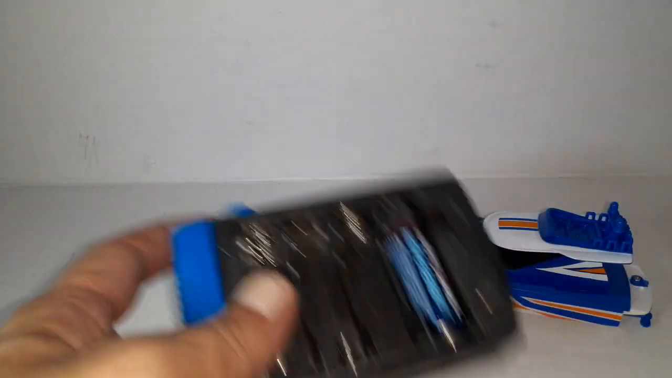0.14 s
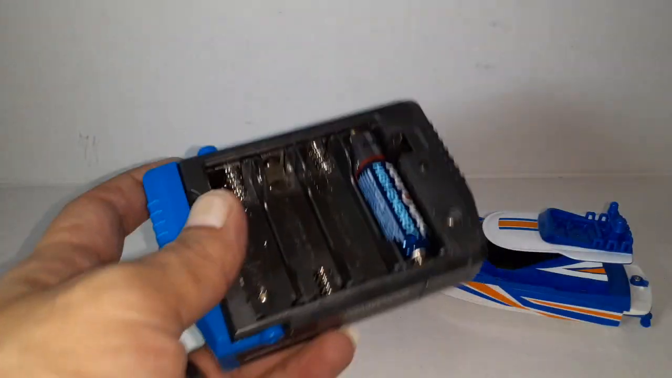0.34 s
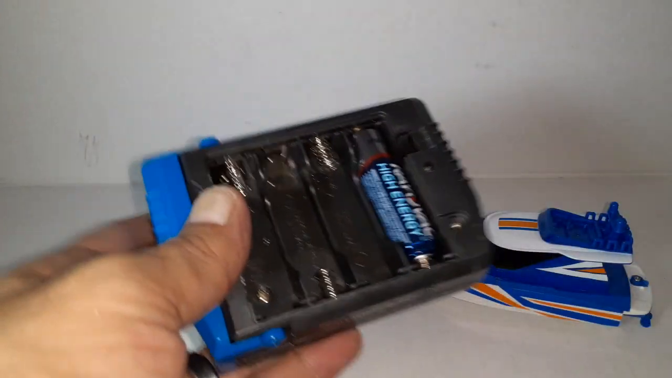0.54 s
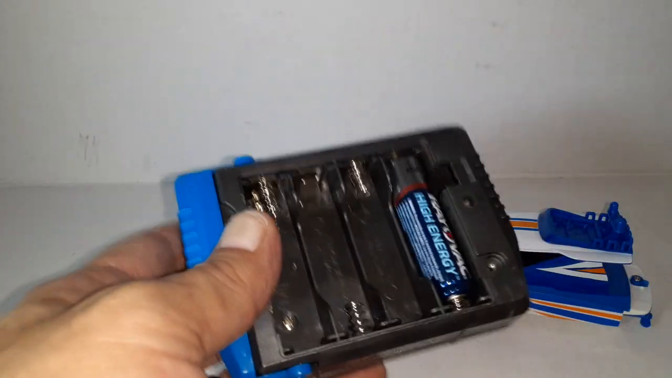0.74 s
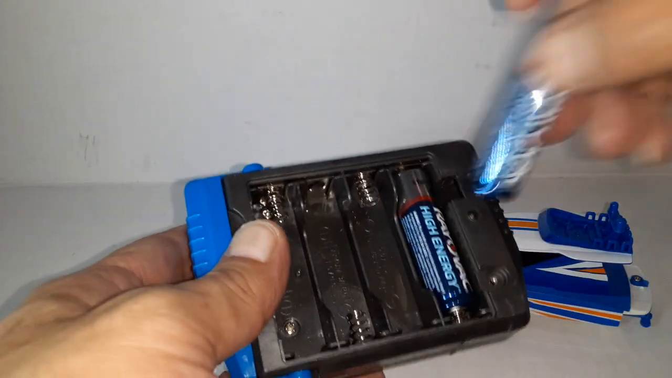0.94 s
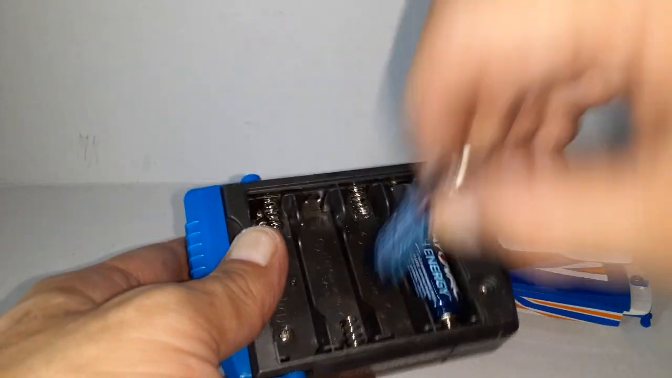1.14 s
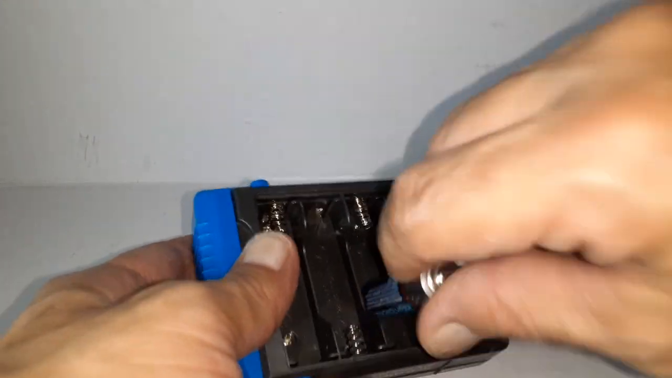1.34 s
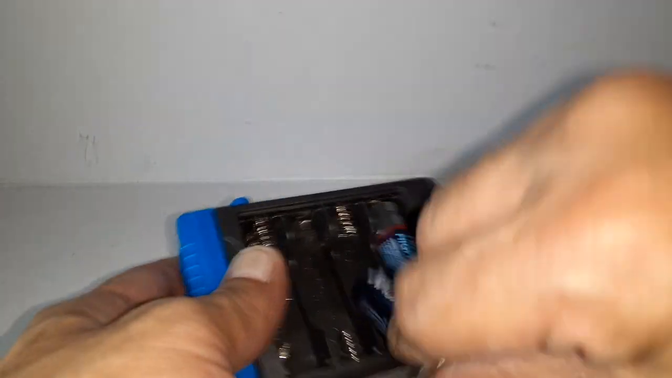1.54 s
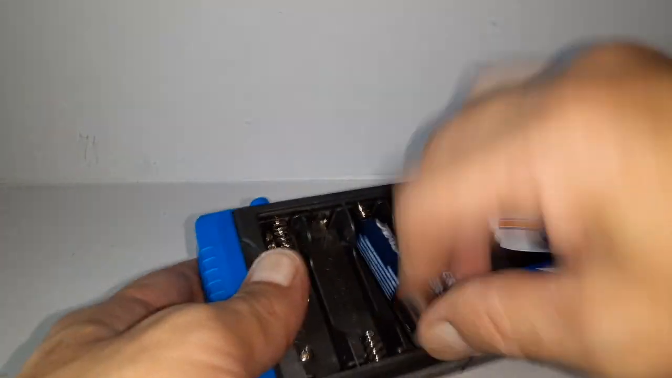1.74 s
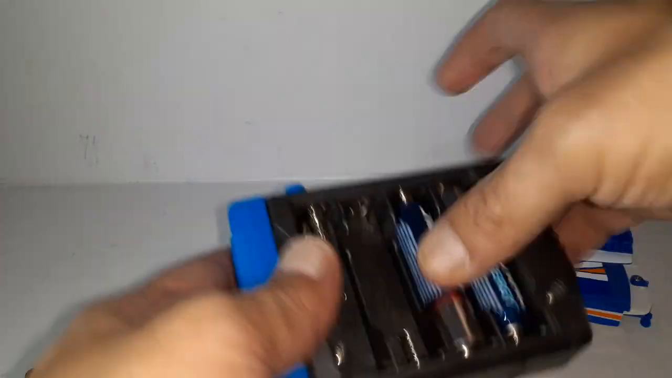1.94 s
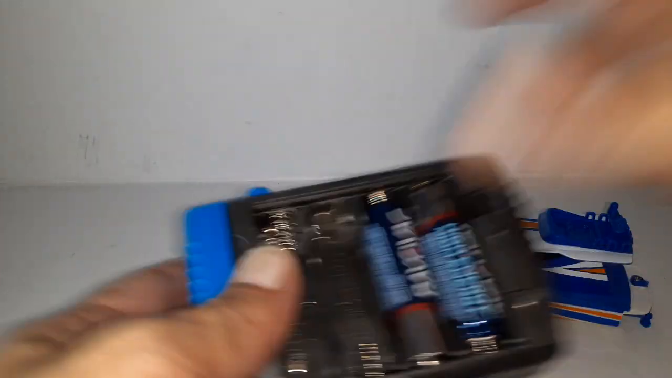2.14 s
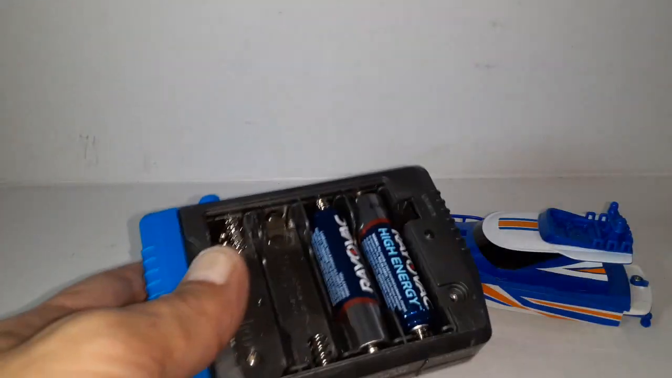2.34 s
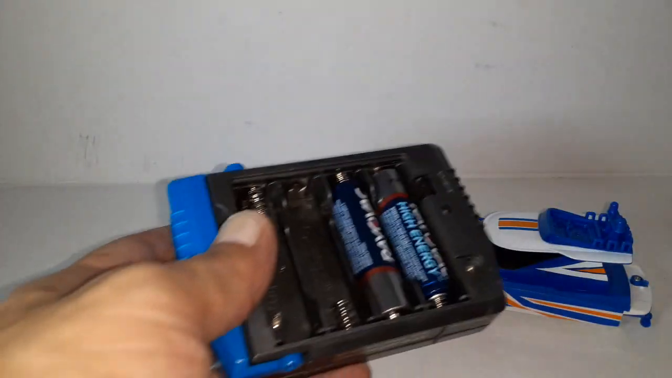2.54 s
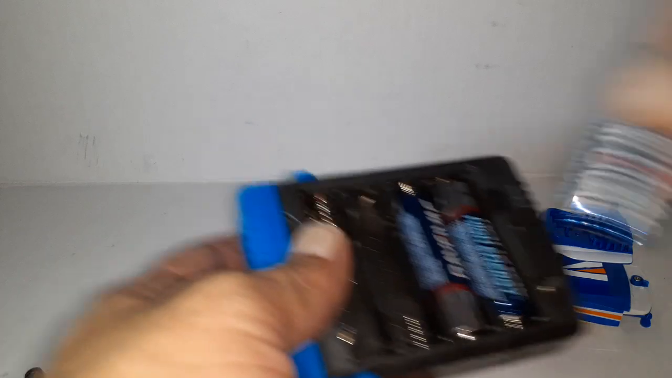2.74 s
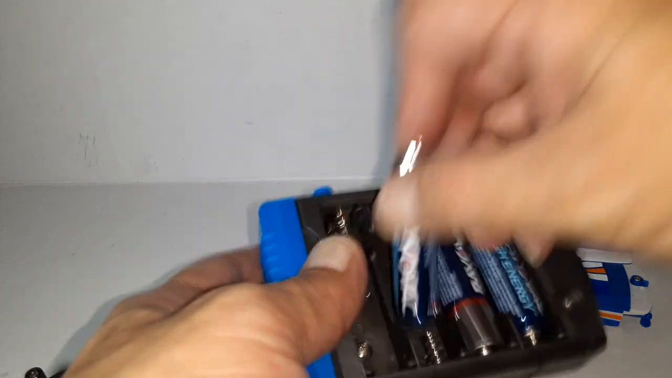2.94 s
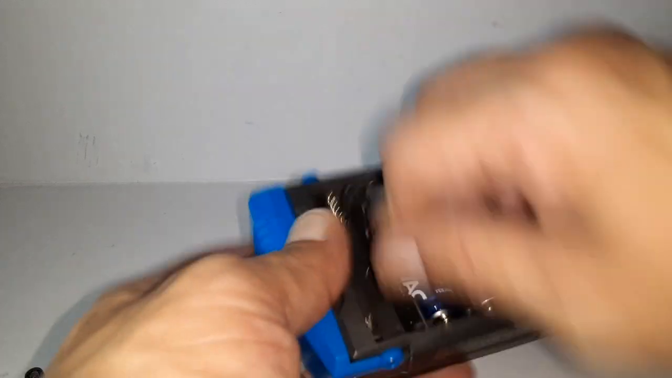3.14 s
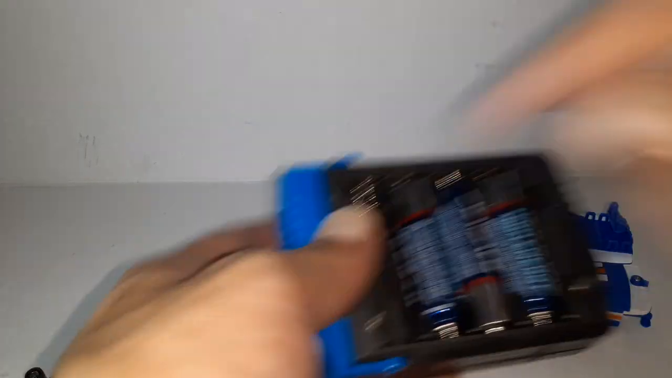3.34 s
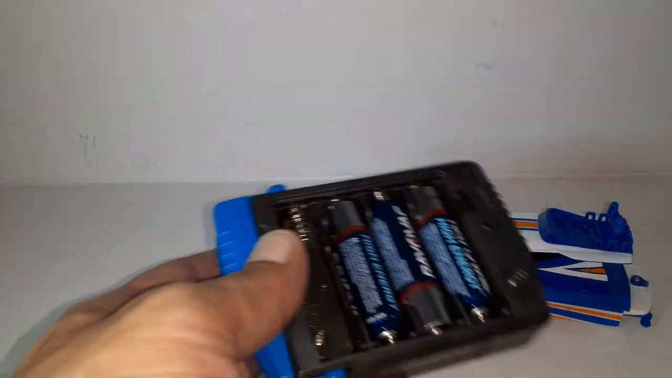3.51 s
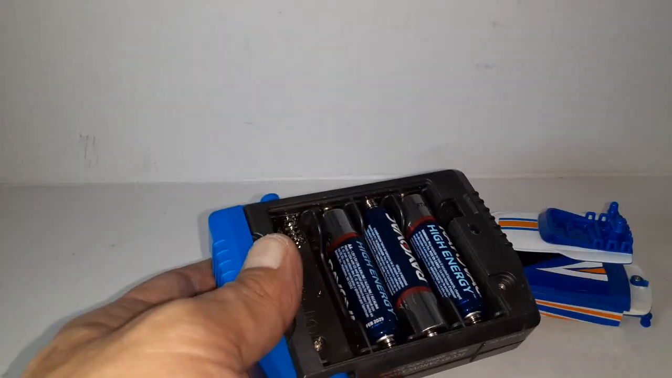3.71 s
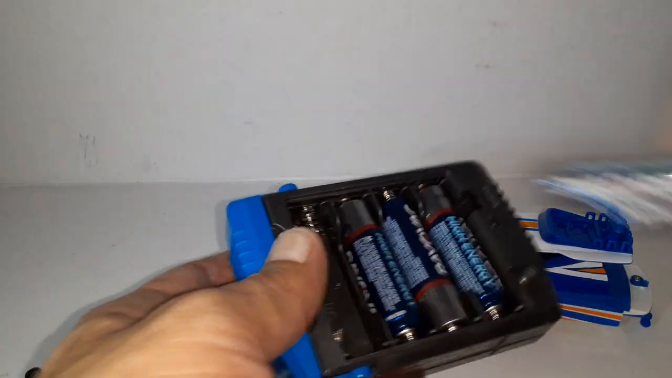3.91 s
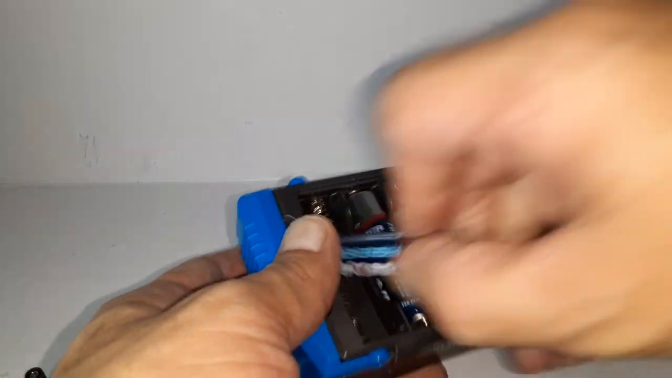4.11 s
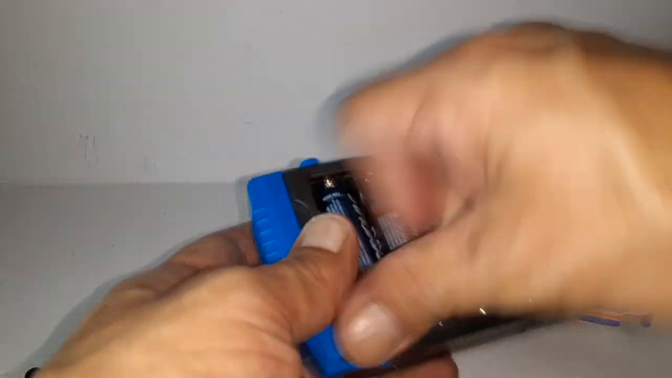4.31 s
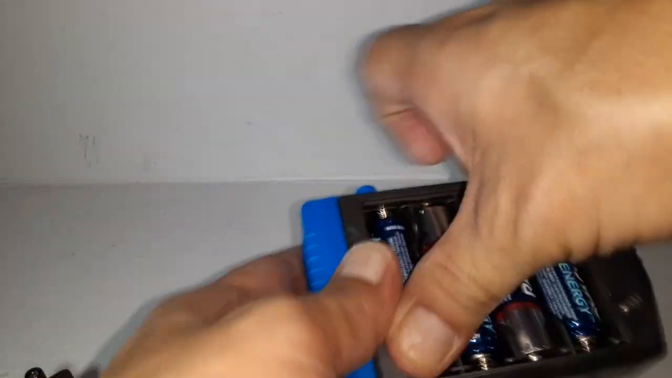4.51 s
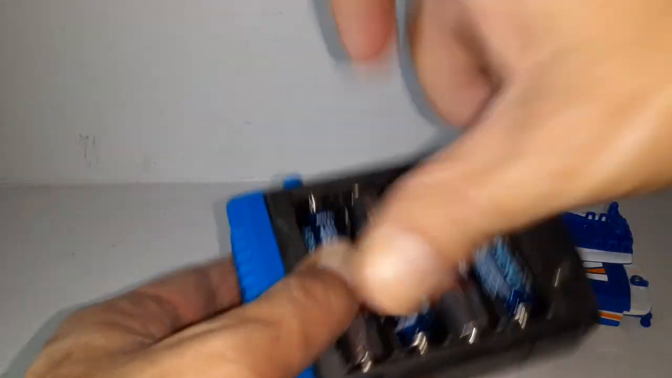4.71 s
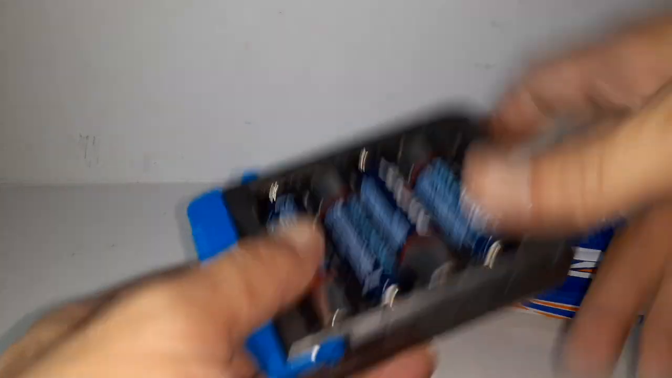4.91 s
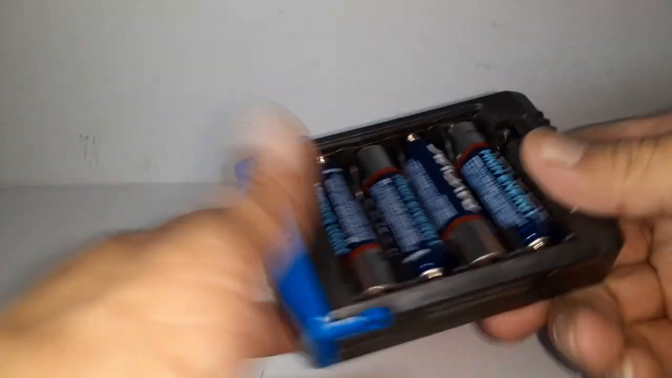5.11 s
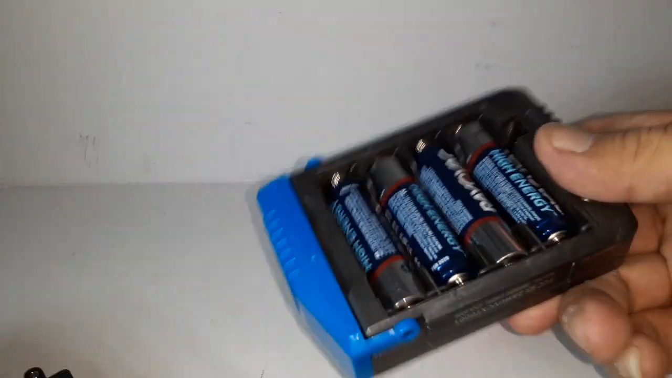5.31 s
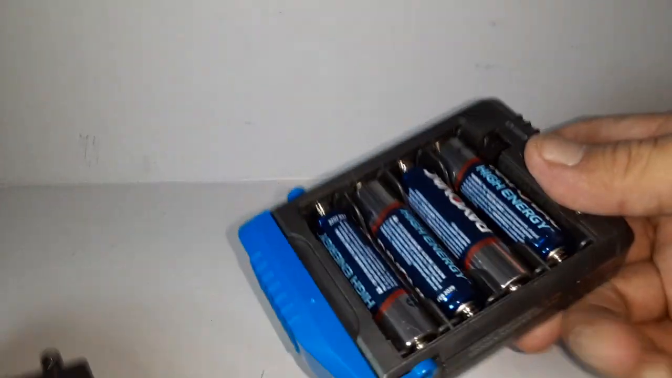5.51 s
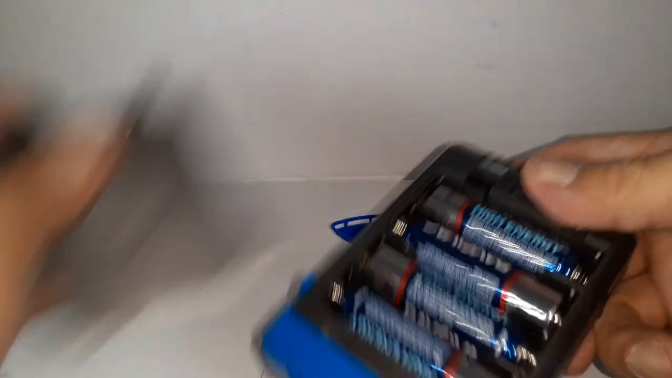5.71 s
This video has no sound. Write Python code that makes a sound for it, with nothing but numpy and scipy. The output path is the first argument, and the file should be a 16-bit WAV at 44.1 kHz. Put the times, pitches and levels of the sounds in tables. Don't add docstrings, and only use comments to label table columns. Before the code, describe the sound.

Close stereo phone pickup in a small quiet room. Faint plastic ticks as a battery case turns in a hand, then a cell is fumbled in with scraping and a dense run of hard clacks. Two more cells follow in separate bursts with metal chatter and small spring twangs, then the lid gives a hollow knock. Low hum and soft hiss lie underneath.

```python
import sys
import numpy as np
from scipy import signal
from scipy.fft import rfft, irfft
from scipy.io import wavfile
from scipy.ndimage import uniform_filter1d

SR = 44100
rng = np.random.default_rng(int(sys.argv[2]) if len(sys.argv) > 2 else 0)


def boost_factor(decibels):
    exponent = np.asarray(decibels, float) / 20
    return 10 ** exponent


def wrap_up_sound(samples):
    columns = np.atleast_2d(samples).T
    tamed = np.clip(columns, -1, 1)
    steps = np.round(tamed * 32767).astype(np.int16)
    wavfile.write(sys.argv[1], SR, steps)


N = 254016

# (frequency [Hz], density [dB per Hz])
METAL = [(2060, -33), (3500, -1.5), (4730, -1.5), (7050, -5.5), (7990, -9.5), (8830, -5), (10900, -5.5),
         (15600, -9)]
LID_FROM_S = 5.33
# (lag of right port [ms], left minus right [dB], phase scatter [rad])
WALL_PORTS, HOLLOW_PORTS = (.12, 8.5, .45), (.08, 6, .35)


def knocks():
    out = np.zeros((2, N + SR))
    size = 2048
    lead = size // 8
    t = np.arange(size) / SR
    first = int(.0045 * SR)
    closing_s, rebound_db = .0005, 4.2
    snap = 4.7
    port_db = np.array([[.7], [-.7]])
    for s, wall_db, hollow_db, metal_db, bright_db, chatter_ms in blows():
        wall_modes, bay_modes, bright_db = place(s, bright_db)
        decay = np.exp(-t * 1000 / np.clip(chatter_ms, .3, 15))
        fade = (1 - np.exp(-t / closing_s)) * decay
        noise = rng.standard_normal((3, size))

        push = 0.063 * noise[0] * boost_factor(rebound_db * noise[1]) * fade
        push[0] += .9
        wall = signal.fftconvolve(ring(wall_modes, *WALL_PORTS), push[None], axes=1)[:, :size]
        hollow = signal.fftconvolve(ring(bay_modes, *HOLLOW_PORTS), push[None], axes=1)[:, :size]

        grit = ports(noise[2]) + 9.0 * rng.standard_normal((2, size))
        grit = grit * fade * boost_factor(1.6 * noise[1])
        grit[:, :8] += snap * ports(np.arange(8) == 0)
        metal = tilt(colour(np.roll(grit, lead, axis=1), METAL), bright_db)
        patch_db = 2.4 * rng.standard_normal(16)
        metal = colour(metal, np.transpose([np.geomspace(3000, 16000, 16), patch_db]))
        metal = metal * np.sqrt(first / np.sum(metal[0] ** 2))

        i = int(s * SR)
        j = max(i - lead, 0)
        out[:, i:i + size] += boost_factor(wall_db) * unit(wall, size=first)
        out[:, i:i + size] += boost_factor(hollow_db) * unit(hollow, size=first)
        out[:, j:j + size] += boost_factor(metal_db + port_db) * metal
    return out[:, :N]


def blows():
    # (time [s], wall ring [dB], hollow thud [dB], metal crack [dB], contact chatter [ms])
    second_cell = [(1.0629, -32.5, -43.5, -40, 12), (1.104, -25, -38, -33.5, 6.6),
                   (1.2566, -28.5, -38, -35, 4.9), (1.2889, -15, -31.5, -22.5, 1.2),
                   (1.554, -29.5, -38, -43.5, 6.1), (1.566, -23, -34, -34.5, 1.1),
                   (1.5779, -26.5, -41.5, -33.5, 2.3), (1.626, -44.5, -38.5, -30, 2),
                   (1.648, -13.5, -17.5, -21, 3.8), (1.6833, -12.5, -30, -27, 1.5),
                   (1.6897, -23.5, -36.5, -24, 14), (1.702, -19, -32.5, -35.5, 2.9),
                   (1.7913, -17, -22, -14.5, 5.2), (1.8025, -22.5, -30.5, -27, 5.5),
                   (1.8231, -17, -42, -26.5, 3.6), (1.869, -15, -29, -17.5, 2.6),
                   (1.8932, -14, -33, -21, 2.1), (1.9163, -31, -42.5, -26.5, 2.3),
                   (1.9229, -32, -48, -24, 3.8), (1.9821, -21, -39, -24, 2.3),
                   (2.025, -31.5, -47, -37, 6.9), (2.1818, -33, -73, -42.5, 7.1)]
    later_cells = [(2.9369, -22.5, -28, -26.5, 1.4), (2.9469, -14, -41, -16.5, 3.6),
                   (2.9579, -17, -35, -34, 2.8), (3.0085, -30.5, -49, -25.5, 3.3),
                   (3.0207, -36.5, -47, -40.5, 6), (3.038, -10.5, -25, -19, 3.5),
                   (3.1425, -17, -30.5, -18, 0.96), (3.249, -28.5, -72, -40, 3.7),
                   (4.132, -23, -39, -45, 1.7), (4.1341, -20.5, -31, -18.5, 4.2),
                   (4.2994, -31, -37, -52, 2.8), (4.3136, -27.5, -63, -31.5, 12),
                   (4.3313, -21.5, -38, -32.5, 5.1), (4.3511, -33, -40.5, -29.5, 7.1),
                   (4.37, -29.5, -44, -26.5, 2.4), (4.3937, -28, -42.5, -27.5, 2.7),
                   (4.6749, -33, -70, -35, 6.6), (4.7223, -27.5, -59, -35.5, 3.1),
                   (5.005, -18, -40, -25.5, 7.6), (5.0122, -42, -36.5, -30, 5.2)]
    grip_knocks = [
        (0.0103, -31.5, -66, -38.5, 1.7),
        (0.0145, -31.5, -50, -31.5, 8.1),
        (0.3478, -38.5, -48.5, -36, 3.5),
        (0.811, -35.5, -52.5, -34.5, 2.7),
        (5.41, -50, -28.5, -26.5, 2.5),
        (5.4269, -26.5, -34, -33.5, 7.1),
        (5.4374, -15.5, -19, -23, 1.9),
        (5.521, -41, -35.5, -28, 1.8),
    ]
    # (time [s], wall ring [dB], metal crack [dB]) light ticks as hands, case and cells touch
    light_ticks = [(0.049, -41.5, -58), (0.0714, -42, -47), (0.0892, -69, -54), (0.1028, -64, -50.5),
                   (0.1685, -39.5, -45), (0.1865, -47, -58), (0.214, -42, -45), (0.235, -38, -43),
                   (0.25, -41.5, -46.5), (0.268, -80, -47.5), (0.342, -43, -54), (0.471, -50, -51),
                   (0.527, -43.5, -48.5), (0.549, -62, -51), (0.6647, -65, -64), (0.7098, -45, -56),
                   (0.7287, -43.5, -47), (0.754, -46.5, -56), (1.1442, -58, -47), (1.1564, -57, -49),
                   (1.377, -60, -53),
                   (1.7679, -44.5, -44.5), (2.0703, -44.5, -49.5), (2.089, -47, -41),
                     (2.1113, -51, -42.5), (2.1296, -37.5, -40), (2.1446, -40, -43.5), (2.2151, -59, -51.5),
                     (2.2726, -55, -55), (2.2799, -53, -51.5), (2.491, -55.5, -47), (2.5026, -65, -62),
                     (2.51, -71, -49), (2.8255, -52, -57.5), (2.8708, -60, -72.5), (3.0928, -39, -33.5),
                     (3.37, -44.5, -52), (3.438, -73.5, -56.5), (5.206, -67, -57.5), (5.2703, -46, -45),
                     (5.6586, -62, -65), (5.687, -58, -52),
                   (4.174, -54, -44), (4.224, -41, -61), (4.2665, -36.5, -45), (4.282, -44, -54),
                   (4.4476, -41.5, -59), (4.474, -36, -36), (4.485, -37.5, -41.5), (4.5109, -55, -40),
                   (4.5255, -61, -47), (4.588, -40.5, -45.5), (4.5963, -50, -43), (4.6366, -47, -50),
                   (4.6585, -40, -46), (4.759, -45, -45), (4.7795, -43.5, -40.5), (4.7963, -49, -48.5),
                   (4.8056, -52, -46.5), (4.824, -67, -44), (4.884, -52, -45.5), (4.951, -59, -48),
                   (4.9703, -45, -58), (5.092, -47.5, -47)]
    rattles = [(1.2736, -28, -43), (1.2941, -38, -30.5), (1.3131, -36.5, -33.5), (1.32, -43, -38.5),
               (1.6694, -26, -37), (1.84, -28, -34.5), (1.877, -23.5, -39), (1.944, -37, -34),
               (2.9723, -30, -28), (3.0655, -38, -36.5), (3.1002, -30.5, -47), (3.103, -39, -35.5),
               (3.127, -43, -40), (3.163, -40, -34), (3.2066, -35.5, -41.5), (3.2653, -41, -39.5),
               (3.274, -34.5, -34.5), (3.312, -37, -62), (4.1593, -40, -40), (4.3066, -37, -37),
               (4.3223, -36, -29), (4.362, -32, -33), (4.38, -35, -32.5), (5.0214, -32, -36.5)]
    cell_bounces = [(1.281, -39, -44.5), (1.306, -32, -36.5), (1.334, -51.5, -52), (1.3416, -60, -51),
                    (1.3562, -43, -46.5), (1.5943, -47.5, -49.5), (1.6307, -23.5, -39.5),
                    (1.713, -29.5, -42), (1.718, -31, -43), (1.7853, -37, -42), (1.7928, -17, -28),
                    (1.8109, -32, -35), (1.8166, -31, -33), (1.828, -23, -35.5), (1.8816, -29.5, -36.5),
                    (1.9056, -31, -33), (1.9096, -32.5, -34.5), (1.9289, -37.5, -33.5),
                    (1.9537, -61, -42.5), (2.0128, -50, -44.5), (2.0296, -44, -44.5),
                    (2.9801, -26.5, -45), (2.984, -45, -35), (3.0229, -39, -38), (3.0306, -55, -48),
                     (3.0443, -33, -29), (3.0486, -24, -30), (3.0612, -27.5, -32), (3.076, -41.5, -49.5),
                     (3.0845, -37, -49), (3.109, -36.5, -39.5), (3.1491, -30.5, -34), (3.1582, -37, -36),
                     (3.165, -36, -37), (3.1758, -40, -41.5), (3.224, -42, -38), (3.2318, -41, -38),
                     (3.2545, -49, -47.5), (3.304, -38.5, -52), (3.3223, -44, -64), (4.1437, -35, -46),
                     (4.1683, -47, -38), (4.2106, -45, -46.5), (4.254, -55, -44), (4.3465, -29, -29),
                     (4.4008, -39, -37), (4.4057, -40, -44), (4.464, -44, -56.5), (4.651, -54, -46),
                     (4.7164, -34, -35.5), (4.895, -46.5, -70), (4.996, -39, -62)]
    # (time [s], wall ring [dB], hollow thud [dB], metal crack [dB])
    lid_bumps = [(5.3942, -48, -46, -54), (5.3981, -49, -32, -48), (5.403, -45, -33, -44.5),
                 (5.415, -48, -29.5, -45.5), (5.4295, -42, -22.5, -38), (5.442, -29, -20.5, -61),
                 (5.4502, -40, -30.5, -54), (5.4568, -47, -31, -47), (5.4614, -49, -40, -43.5),
                 (5.4727, -38, -44, -51), (5.597, -47, -64, -53)]

    bounce_ms = 5.8
    rows = second_cell + later_cells + grip_knocks
    rows = rows + [(*row, bounce_ms) for row in lid_bumps]
    # hollow level relative to the wall [dB], chatter [ms]
    for events, hollow_db, chatter_ms in [(rattles, -14.5, 3.8),
                                          (light_ticks, -15, 3.2),
                                          (cell_bounces, -15.5, bounce_ms)]:
        rows = rows + [(s, db, db + hollow_db, metal_db, chatter_ms) for s, db, metal_db in events]
    return [(s, db, hollow_db, metal_db, brightness(metal_db, db), ms)
            for s, db, hollow_db, metal_db, ms in rows]


def place(s, bright_db):
    # (time [s], favoured wall mode [Hz], favoured bay mode [Hz], crack brightness [dB])
    strike_points = [(0.0105, 2070, 980, 2.5), (0.0495, 2106, 1130, 5), (0.072, 2100, 1230, 15.5),
                     (0.1686, 2120, 1220, -4), (0.1885, 2190, 1260, -3), (0.212, 1860, 1200, 2),
                     (0.235, 2170, 1000, 1), (0.349, 2060, 1330, 0.5), (0.526, 2120, 910, 13.5),
                     (0.7286, 2340, 1220, -22), (0.811, 1810, 1330, -2), (1.062, 1890, 855, 2),
                     (1.1037, 1910, 1230, -5), (1.256, 2050, 760, -4), (1.2892, 2250, 830, 4),
                     (1.555, 1990, 940, -1.5), (1.5656, 2100, 973, -5), (1.578, 2070, 1083, -5.5),
                     (1.63, 1955, 1040, -7.5), (1.6476, 2077, 644, -1.5), (1.6826, 1985, 1205, 4.5),
                     (1.702, 2023, 1187, 0.5), (1.7906, 1800, 1194, 6), (1.8235, 1696, 1309, -5),
                     (1.869, 2100, 1250, 6), (1.8933, 2210, 1034, 5), (1.917, 2217, 1020, -4.5),
                     (1.9823, 1960, 1010, 2.5), (2.026, 2140, 1100, -3.5), (2.1285, 1850, 980, -3.5),
                     (2.1825, 1990, 1050, -8.5), (2.9369, 1836, 1258, 7), (2.9465, 2030, 1270, -1.5),
                     (3.0086, 2280, 975, 6), (3.0379, 2290, 522, -2.5), (3.098, 2047, 1039, 5),
                     (3.1426, 1850, 600, -1.5), (3.2484, 2000, 1020, 1), (3.274, 2110, 1030, 1.5),
                     (4.134, 2100, 1330, 1), (4.2657, 2080, 1040, -0.5), (4.3003, 2080, 1200, -6),
                     (4.3316, 2070, 1270, 1), (4.3943, 1980, 1180, -1.5), (4.4746, 2190, 1110, 3),
                     (4.6763, 2370, 1090, -7), (4.7216, 2370, 970, -7), (5.006, 2250, 1150, -3.5),
                     (5.4372, 2590, 1220, 4), (5.522, 2130, 980, 9.5)]
    reach_s = .006
    when, wall_hz, bay_hz, place_db = min(strike_points, key=lambda row: abs(row[0] - s))
    if abs(when - s) > reach_s:
        return walls(s), bays(s), bright_db
    return favour(walls(s), wall_hz), favour(bays(s), bay_hz), place_db


def favour(modes, hz):
    lift_db, octaves = 6.5, 0.15
    return [(f, t60, db + lift_db * np.exp(-(np.log2(f / hz) / octaves) ** 2)) for f, t60, db in modes]


def walls(s):
    # (frequency [Hz], T60 [s], level [dB])
    case_modes = [(1720, 0.0043, -5), (1808, 0.018, -0.5), (1850, 0.0096, 4.5), (2065, 0.0083, 2.5),
                  (2246, 0.012, 1), (2302, 0.009, -4), (2936, 0.015, -7.5), (3393, 0.02, -13.5),
                  (4040, 0.0021, -17)]
    # (frequency [Hz], T60 [s], level [dB])
    lid_modes = [(1720, 0.0037, 1), (2100, 0.0055, 2), (2500, 0.0046, -1), (2760, 0.013, -6.5),
                 (3100, 0.0096, -8), (3600, 0.0078, -12)]
    return lid_modes if s > LID_FROM_S else case_modes


def bays(s):
    # (frequency [Hz], T60 [s], level [dB])
    case_bays = [(376, 0.016, -9), (475, 0.02, -11.5), (635, 0.033, -9.5), (655, 0.024, -5),
                 (844, 0.014, -5.5), (924, 0.023, -6), (1168, 0.0082, 4.5), (1185, 0.018, 2),
                 (1360, 0.017, -7.5)]
    # (frequency [Hz], T60 [s], level [dB])
    lid_bays = [(317, 0.035, -21), (484, 0.015, -17), (600, .018, -3.5), (762, 0.0088, -1.5),
                (980, 0.018, 0), (1220, 0.015, 2.5), (1418, 0.0061, 2), (1640, 0.0088, -4.5)]
    return lid_bays if s > LID_FROM_S else case_bays


def brightness(metal_db, wall_db):
    return np.clip(1.5 + 0.73 * (metal_db - wall_db), -12, 10)


def ring(modes, lag_ms, left_db, twist, detune=.024):
    spread_db = 2.0
    hz, t60, db = np.transpose(modes)[:, :, None]
    chance = rng.standard_normal((4, len(modes), 1))
    hz = hz * (1 + detune * chance[0])
    t = np.arange(SR // 40) / SR
    sense = np.cos(np.pi * np.arange(len(modes)))[:, None]
    size = sense * boost_factor(db + spread_db * chance[1]) * np.exp(-np.log(1000) * t / t60)
    left = size * np.sin(2 * np.pi * hz * t)
    late = np.maximum(t - lag_ms / 1000, 0)
    scatter = boost_factor(2.0 * chance[2] - left_db)
    right = size * scatter * np.sin(2 * np.pi * hz * late + twist * chance[3]) * (late > 0)
    pair = np.array([left.sum(axis=0), right.sum(axis=0)])
    keep = np.exp(-np.pi * modes[0][0] / SR)
    return signal.lfilter([1, -2, 1], [1, -2 * keep, keep ** 2], pair)


def slides():
    t = np.arange(N) / SR
    wall_db, metal_db, hollow_db = pressure()
    wander_db = 2.0 * unit(uniform_filter1d(rng.standard_normal(N), size=900))
    bright_db = brightness(metal_db, wall_db) + wander_db
    catch = boost_factor(1.8 * unit(uniform_filter1d(rng.standard_normal(N), size=150)))
    slips = catch * rng.standard_normal((3, N)) * boost_factor(rng.exponential(size=(3, N)))

    spot = 3 * (t > LID_FROM_S) + np.repeat(rng.integers(3, size=N // 500 + 1), 500)[:N]
    wall, hollow = 0, 0
    for k in range(6):
        here = slips * (spot == k)
        when = LID_FROM_S + 1 if k > 2 else 0
        wall_ring = unit(ring(walls(when), *WALL_PORTS))
        bay_ring = unit(ring(bays(when), *HOLLOW_PORTS))
        wall = wall + signal.oaconvolve(wall_ring, here[:1], axes=1)
        hollow = hollow + signal.oaconvolve(bay_ring, here[1:2], axes=1)

    grit = 0.21 * ports(slips[2]) + 2.7 * catch * rng.standard_normal((2, N))
    metal = tilt(unit(colour(grit, METAL)), bright_db)
    specks_db = 1.4 * unit(uniform_filter1d(slips[2] / catch, size=45))
    metal = unit(metal * catch * boost_factor(specks_db))
    body = boost_factor(wall_db + 1.5) * unit(wall[:, :N]) + boost_factor(hollow_db - 7.0) * unit(hollow[:, :N])
    return body + boost_factor(metal_db + 2.0) * metal


def pressure():
    # (start [s], length [s], wall scrape [dB], contact hiss [dB], hollow scrape [dB])
    cell_scrapes = [(1.063, 0.066, -42.5, -65, -48), (1.26, 0.077, -34, -39, -34.5),
                    (1.558, 0.055, -35.5, -39.5, -37), (1.648, 0.08, -29, -33.5, -56.5),
                    (1.798, 0.052, -26, -33.5, -47), (1.871, 0.092, -36, -35, -54.5),
                    (2.005, 0.053, -48, -55, -42.5), (2.095, 0.066, -47, -58, -53.5),
                    (2.954, 0.049, -31.5, -34.5, -39.5), (3.012, 0.052, -31, -37, -54),
                    (3.097, 0.036, -40, -47, -50.5), (3.14, .05, -31, -35, -55.5),
                    (3.196, 0.12, -39.5, -37.5, -51), (4.132, 0.046, -36.5, -35, -70),
                    (4.202, 0.15, -47.5, -50, -52), (4.305, 0.081, -34.5, -34, -56),
                    (4.998, 0.073, -42.5, -46, -44)]
    skin_rubs = [(0, 0.11, -48, -56, -69.5), (0.192, 0.069, -46, -53, -46), (0.283, 0.087, -61, -58.5, -78),
                 (0.427, 0.18, -70, -66.5, -67), (0.731, 0.029, -49, -59, -49), (0.88, 1, -85.5, -94, -81),
                 (1.319, 0.083, -53, -63.5, -49), (2.202, 0.7, -70.5, -82, -64.5),
                 (2.393, .13, -74.5, -62, -74), (3.631, 0.1, -74, -68, -64),
                 (4.463, 0.077, -49, -48.5, -51), (4.568, .07, -55.5, -58.5, -73),
                 (4.649, 0.051, -46, -49, -50.5), (4.72, 0.21, -59.5, -65.5, -52),
                 (4.956, 0.11, -54.5, -61, -62), (5.058, 0.13, -56.5, -57.5, -68),
                 (5.137, 0.56, -69.5, -70.5, -62.5), (5.391, 0.095, -44.5, -48, -31),
                 (5.43, 0.039, -35.5, -57.5, -37), (5.47, 0.066, -45, -51.5, -33.5),
                 (5.542, 0.093, -54.5, -47, -48), (5.599, 0.026, -49.5, -44, -37.5),
                 (5.656, 0.05, -61.5, -68.5, -59), (5.719, 0.013, -58, -66, -67)]
    counts = [len(cell_scrapes), len(skin_rubs)]
    t = np.arange(0, N, 96) / SR
    start, length, *layers = np.transpose(cell_scrapes + skin_rubs)[:, :, None]
    since = t - start
    attack_db_s = np.repeat([6001.5, 1705], counts)[:, None]
    ease_db = np.repeat([-2.5, 0], counts)[:, None]
    sag_db, release_db_s = 6.5, 476.5
    shape = ease_db + attack_db_s * np.minimum(since, 0)
    shape = shape - sag_db * np.clip(since / length, 0, 1)
    shape = shape - release_db_s * np.maximum(since - length, 0)
    return [np.interp(np.arange(N) / SR, t, np.max(db + shape, axis=0)) for db in layers]


def spring():
    # (frequency [Hz], T60 [s], level [dB])
    coil_modes = [(4700, 0.0036, -3), (5960, 0.016, 9), (5940, .009, -1), (6500, .005, 6.5),
                  (7100, 0.013, -17), (7480, .008, 3.5)]
    # (time [s], ring level [dB])
    coil_slips = [(2.493, -50), (2.503, -51), (3.2737, -41), (3.2833, -33), (3.2872, -40), (3.2967, -44),
                  (3.3788, -55), (4.3368, -30), (4.3522, -31), (4.485, -36.5), (4.4962, -44)]
    out = np.zeros((2, N + SR))
    for s, db in coil_slips:
        twang = unit(ring(coil_modes, WALL_PORTS[0], 1.1, 2.6, detune=.012), size=198)
        i = int(s * SR)
        out[:, i:i + twang.shape[1]] += boost_factor(db) * twang
    return out[:, :N]


def thump():
    start_s, hz, db, decay_s = 3.143, 46, -36, .026
    t = np.maximum(np.arange(N) / SR - start_s, 0)
    return boost_factor(db) * np.exp(-t / decay_s) * np.sin(2 * np.pi * hz * t)


def echo(case):
    t60_s, db = .12, -15
    t = np.arange(int(.3 * SR)) / SR
    tail = rng.standard_normal((2, len(t))) * np.exp(-np.log(1000) * t / t60_s) * (t > .002)
    tail = tail / np.sqrt(np.sum(tail[0] ** 2))
    return boost_factor(db) * signal.fftconvolve(case, tail, axes=1)[:, :N]


def air():
    # (frequency [Hz], density [dB per Hz])
    air_spectrum = [(36, -27.5), (50, -22.5), (150, -11), (330, -28), (430, -29), (620, -27), (950, -31.5),
                    (1800, -37), (4000, -45), (8000, -52), (12000, -46.5)]
    # (frequency [Hz], width [Hz], lift [dB])
    room_modes = [
        (49.8, 16, 10),
        (140.2, 25, 6),
        (215.8, 31, 10.5),
        (292.8, 39, 10),
    ]
    # (frequency [Hz], likeness [-1..1])
    port_likeness = [(30, .85), (130, .93), (290, .76), (640, .25), (1400, -.3), (3000, 0)]
    # (frequency [Hz], left minus right [dB])
    port_balance = [(30, 6.5), (100, 3.8), (1300, 3), (15000, -2)]
    hz = np.arange(N // 2 + 1) * SR / N
    db = curve(air_spectrum, hz)
    for f, width, lift_db in room_modes:
        db = db + lift_db / (1 + (2 * (hz - f) / width) ** 2)
    alike = np.clip(curve(port_likeness, hz), -.99, .99)
    mid, side = rfft(rng.standard_normal((2, N))) * np.sqrt([1 + alike, 1 - alike])
    balance = boost_factor(curve(port_balance, hz) / 2)
    pair = np.array([(mid + side) * balance, (mid - side) / balance])
    return boost_factor(-49) * unit(irfft(boost_factor(db) * pair, N))


def stir_db():
    from_db, db_per_db = -65.5, 0.3528
    busy_db = np.clip(pressure()[2] - from_db, -10, 20)
    return db_per_db * uniform_filter1d(busy_db, size=SR // 3)


def bird():
    centre_s, hz, db, half_s = 3.945, 5900, -76, .024
    t = np.arange(N) / SR - centre_s
    pitch = hz * (1 + .012 * np.tanh(t / half_s + 1))
    warble = 1 + .6 * np.cos(2 * np.pi * 85 * (t - .005))
    return boost_factor(db) * np.exp(-(t / half_s) ** 2) * warble * np.sin(2 * np.pi * np.cumsum(pitch) / SR)


def curve(table, hz):
    f, v = np.transpose(table)
    return np.interp(np.log(hz + 1), np.log(f), v)


def colour(x, table):
    size = x.shape[-1]
    return irfft(rfft(x) * boost_factor(curve(table, np.arange(size // 2 + 1) * SR / size)), size)


def tilt(x, bright_db):
    split_hz = 8000
    low = colour(x, [(split_hz / 1.15, 0), (split_hz * 1.15, -40)])
    share = 1 / (1 + boost_factor(2 * bright_db))
    return np.sqrt(2 * share) * low + np.sqrt(2 - 2 * share) * (x - low)


def unit(x, size=None):
    return x / np.sqrt(np.mean(x[..., :size] ** 2))


def ports(x):
    return np.array([x, np.roll(x, int(WALL_PORTS[0] * SR / 1000))])


def scene():
    case = knocks() + slides() + spring()
    return case + echo(case) + boost_factor(stir_db()) * air() + bird() + thump()


def low_pass(x):
    return signal.sosfilt(signal.butter(12, 17000, fs=SR, output="sos"), x)


def record(dry):
    low_hz, top_hz = 43.6, 15750
    mic = signal.sosfilt(signal.butter(4, low_hz, "high", fs=SR, output="sos"), dry)
    mic = colour(np.clip(mic, -1, 1), [(top_hz, 0), (top_hz * 1.01, -39)])
    return low_pass(mic)


dry = scene()
out = record(dry)
wrap_up_sound(out)
```